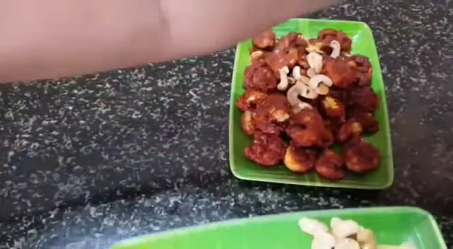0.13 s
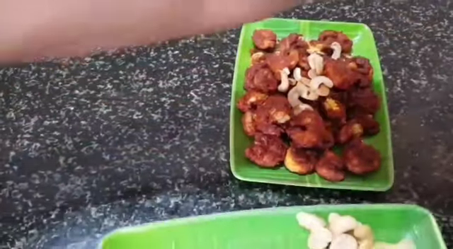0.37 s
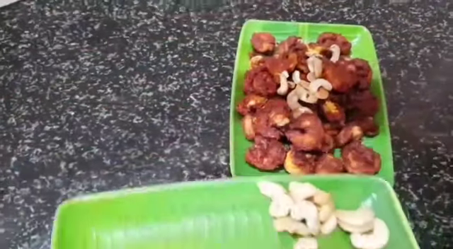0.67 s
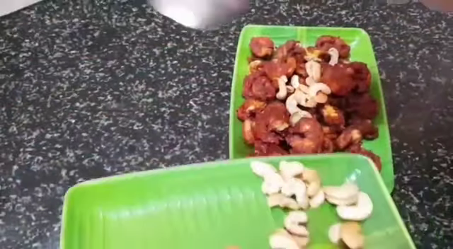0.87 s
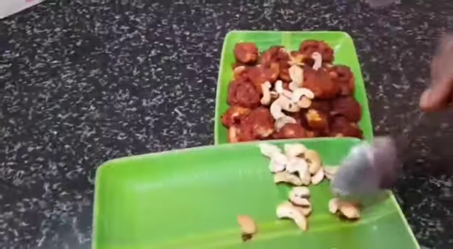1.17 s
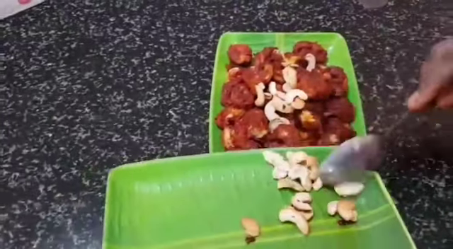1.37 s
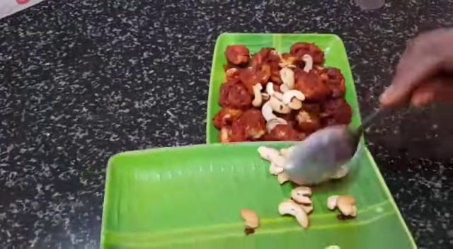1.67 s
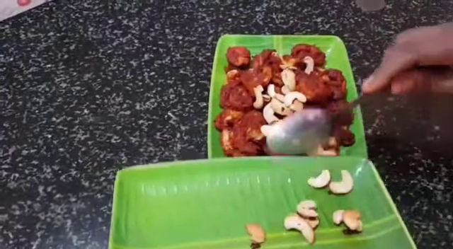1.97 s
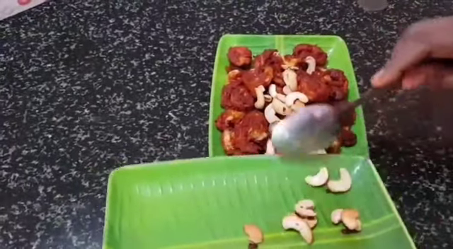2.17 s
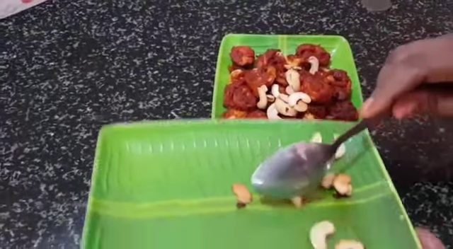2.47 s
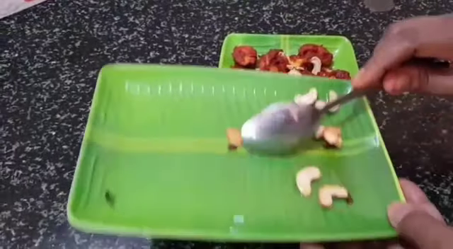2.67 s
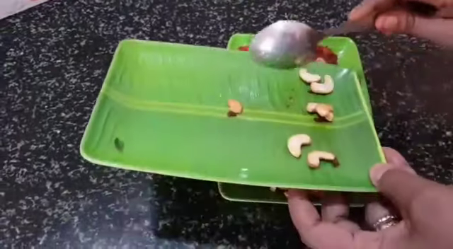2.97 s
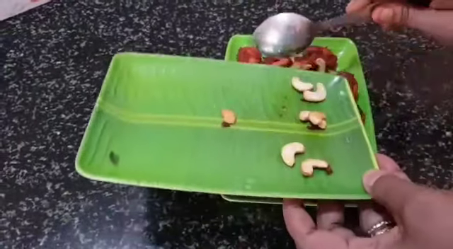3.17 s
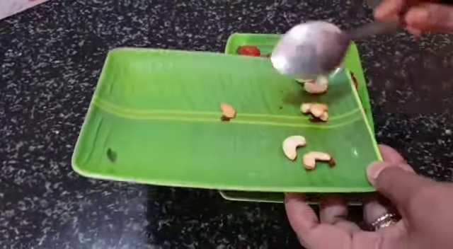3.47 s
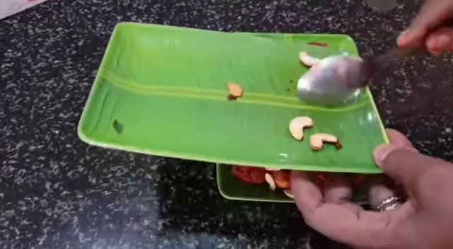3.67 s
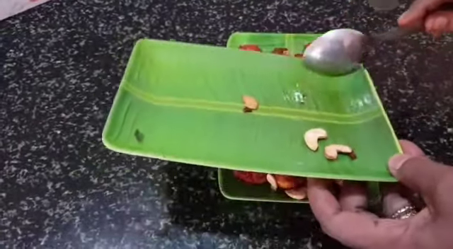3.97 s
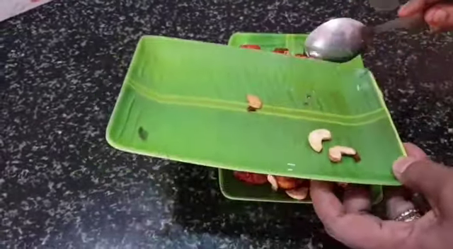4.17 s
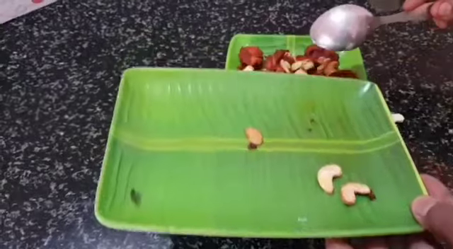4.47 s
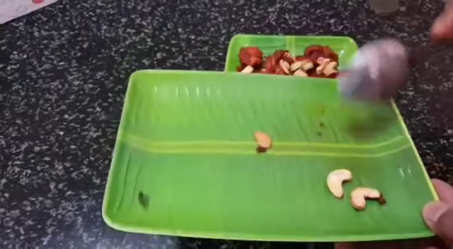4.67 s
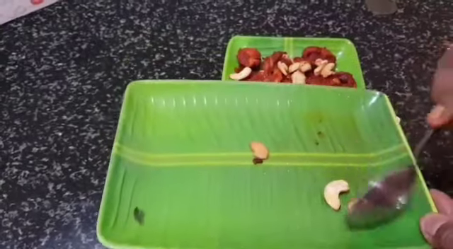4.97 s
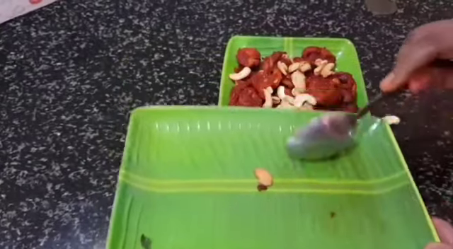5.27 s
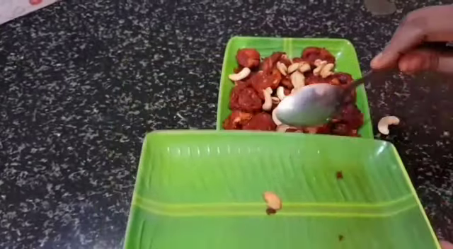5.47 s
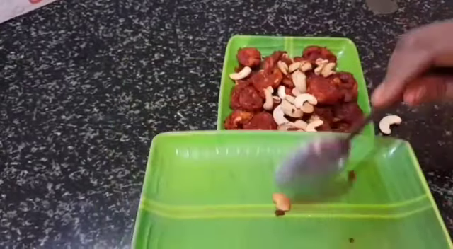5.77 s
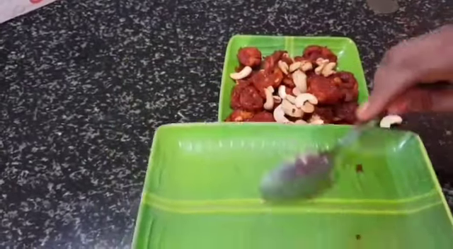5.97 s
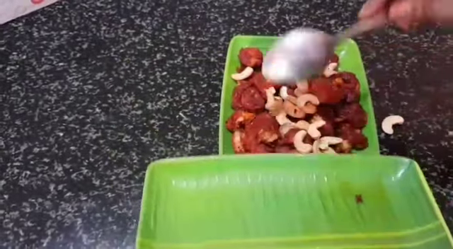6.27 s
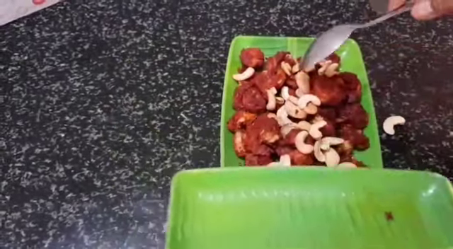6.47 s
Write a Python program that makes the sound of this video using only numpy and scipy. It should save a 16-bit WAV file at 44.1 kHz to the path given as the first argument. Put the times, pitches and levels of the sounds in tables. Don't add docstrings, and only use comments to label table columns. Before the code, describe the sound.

A metal spoon clacks and scrapes across a ribbed plastic tray, knocking nuts loose in a hard kitchen, with an early thump on the microphone.

```python
import sys
import numpy as np
from scipy import signal
from scipy.fft import rfft, irfft, next_fast_len
from scipy.io import wavfile
from scipy.ndimage import uniform_filter1d

SR = 44100
rng = np.random.default_rng(int(sys.argv[2]) if len(sys.argv) > 2 else 0)


def rack_gain(trim_db):
    fader = np.asarray(trim_db, float)
    return 10 ** (fader / 20)


def output_pcm(signal):
    pcm = np.clip(np.atleast_2d(signal).T, -1, 1) * 32767
    wavfile.write(sys.argv[1], SR, np.round(pcm).astype(np.int16))


N = 291501

# start_s [s], level_db [dB]
RUMBLE_LEVEL = [(0.0, -57.5), (0.83, -56.5), (1.88, -58.5), (2.34, -64), (3.22, -62), (3.9, -58),
                (4.97, -64), (5.319, -52.5), (5.7, -66), (6.22, -55), (6.61, -59.5)]
# pitch_hz [Hz], level_db [dB per Hz]
RUMBLE_COLOUR = [(25, -22), (39, -7), (62, -2), (160, 1), (250, -10), (310, -5.5), (500, -12), (700, -26.5)]
# pitch_hz [Hz], level_db [dB per Hz]
HISS_COLOUR = [(800, 0), (2000, -6), (6300, -12), (8000, -18), (13000, -16), (16000, -21)]
# pitch_hz [Hz], share [0..1]
AIR_LIKENESS = [(60, .94), (130, .9), (290, 0.9), (640, 0.21), (1400, 0.06)]
# start_s [s], length_s [s], level_db [dB], pitch_hz [Hz]
MOTOR_SWELLS = [
    (3.375, 0.19, -53, 93),
    (4.247, 0.15, -53.5, 90.6),
    (5.29, 0.073, -50.5, 97.4),
    (5.49, 0.15, -54.5, 96.5),
    (5.86, .1, -54.5, 93),
]
# pitch_hz [Hz], t60_s [s]
KITCHEN_DECAY = [(300, 0.3), (1000, 0.33), (3000, 0.43), (8000, 0.31), (16000, 0.46)]
# pitch_hz [Hz], share [0..1]
ECHO_LIKENESS = [(300, 0.75), (640, 0.91), (1000, .3), (1400, 0.049)]
# start_s [s], end_s [s]
SILENCE = (6.452, 6.535)
# start_s [s], peak_db [dB], push_ms [ms]
FINGER_BUMPS = [
    (0.633, -58, 13),
    (0.667, -20, 4.2),
    (0.715, -20, 9.2),
    (0.725, -11.5, 1.44),
    (0.738, -11, 3.1),
    (0.747, -15, 3.4),
    (0.769, -21, 4.2),
    (0.779, -19, 2),
    (.797, -24.5, 5.3),
    (0.818, -31.5, 6),
]
# [dB, left minus right]
BANGLE_TOUCHES = [(0.073, -52, -3), (0.087, -50, 8), (0.0917, -46, -10), (0.1094, -65, -3),
                  (0.3273, -43.5, -4), (0.3359, -45, 15), (0.3448, -34, -1), (0.3565, -31.5, 3.5),
                  (0.3624, -51, 7), (0.3734, -43.5, -17), (0.3894, -61, 9), (5.7289, -66, -10),
                  (5.7578, -62.5, 2)]
# pitch_hz [Hz], level_db [dB], t60_s [s]
BANGLE_MODES = [(4130, -22, .1), (4915, -15, .07), (6110, -8, .13), (6760, -14, .06), (7400, -18, .08),
                (8775, -20, .08), (9943, -7, .1), (10650, -8, .05), (11200, -10, .05), (14350, -8, .08),
                (14540, -2, .055), (15300, -5, .035)]
# [dB, left minus right]
NUT_TAPS = [
    (1.481, -49, 3.5),
    (1.514, -46.5, 1.5),
    (1.538, -54, -6),
    (1.577, -67, 5),
    (1.587, -46, -2),
    (1.619, -55, 2),
    (1.683, -55, -4),
    (1.718, -60, 3.5),
    (1.757, -59.5, -6),
]
# pitch_hz [Hz], level_db [dB], t60_s [s]
RIM_MODES = [(913, 3, 0.029), (987, 5.5, 0.023), (1530, -4.5, 0.03), (2240, -6, 0.013)]
# [dB, left minus right]
RIM_KNOCKS = [(1.3324, -64.5, 12, -29, 4), (1.3664, -44, -6, -12, 0), (1.4137, -45, -7, -15, -8),
              (1.8808, -80, 21.5, -18, 18), (1.9433, -60, 8, -13, 10), (2.0146, -19.5, -13.5, -9.5, -1.5),
              (2.044, -31.5, -16, 4, -8.5), (2.3313, -47.5, -30, -14, 14), (2.3411, -30.5, -24, -30, 2),
              (2.5695, -83.5, -3, 22.5, -9), (2.858, -30.5, 4, -23, 9), (3.022, -26, -10, -18, 7.5),
              (3.049, -32.5, -15, -3, -9.5), (3.0676, -27, -23, -5.5, -1.5), (3.3703, -64, -3.5, -4, -4.5),
              (3.521, -66.5, -6, -9, -10), (3.7669, -16.5, -8, 3.5, -1.5), (3.799, -20, -27.5, -4, -4),
              (3.8454, -19, -7, -13, 7), (4.0612, -31, -16.5, -12, 2), (4.0778, -33, -12, -3.5, -7.5),
              (4.2367, -36, -12, 0, -12.5), (4.245, -39, 0.5, -6.5, 0.5), (5.4591, -53, -11, 6, -6.5)]
# start_s [s], peak_db [dB], body_db [dB], edge_db [dB]
RIB_CHATTER = [(2.419, -48, 0.5, -15), (2.718, -22, -3, -0.5), (2.7369, -25.5, -4, -3),
               (2.8674, -46, 7, -32), (2.9005, -60, -2, -22), (5.0468, -32.5, -1, -7),
               (5.0989, -41, -2, -24.5), (5.1174, -42.5, 3.5, -0.5), (5.1334, -34, -1.5, -7.5),
               (5.1748, -36.5, -0.5, -6), (5.1984, -23.5, -4, -25), (5.224, -35, 7, -11.5),
               (5.234, -21, -6.5, -7.5), (5.2656, -25.5, 0.5, -21), (5.3046, -21, -2, -6.5),
               (5.3346, -32.5, 3, -19.5), (6.0275, -21.5, 1, -4), (6.0625, -22.5, 3.5, -21.5),
               (6.07, -20.5, -1.5, -3.5), (6.0775, -42, -11.5, -18), (6.114, -22.5, 4, -21.5),
               (6.1275, -21, -6, -24.5), (6.142, -42.5, -3, -2), (6.2179, -27, -10, -12.5),
               (6.234, -29, -9.5, -6), (6.25, -37, 1.5, -27.5)]
# start_s [s], length_s [s], level_db [dB], body_db [dB], edge_db [dB]
RIB_SCRAPES = [(1.368, 0.067, -49, -7.5, -3), (1.496, 0.19, -57.5, -1.5, -1.5),
               (1.946, 0.14, -54.5, 5, -6.5), (2.342, 0.02, -45.5, -7.5, -6.5),
               (2.742, 0.097, -45.5, 7.5, -5.5), (2.874, 0.12, -36, 2.5, -6), (3.355, .1, -60, -5, -1.5),
               (3.775, .04, -35.5, -11, -2.5), (3.88, 0.13, -41, -4.5, -5.5),
               (4.239, 0.11, -46.5, -19, -0.5), (5.058, 0.15, -43.5, 6.5, -2.5), (5.173, 0.1, -43, 3, -2.5),
               (5.313, 0.15, -44, 3.5, -6), (6.02, 0.026, -33, 1.5, 5), (6.532, .07, -70.5, -5.5, 16)]
# pitch_hz [Hz], level_db [dB], t60_s [s]
TRAY_MODES = [(626, -8.5, 0.14), (668, -3.5, 0.033), (745, -6, 0.074), (795, -1.5, 0.055),
              (950, -6.5, 0.037), (1008, -5, 0.083), (1217, -6.5, 0.041), (1347, -8.5, 0.024),
              (1627, 4.5, 0.019), (1720, -0.5, 0.023), (2086, -2.5, 0.029), (2258, -6, 0.08),
              (2562, -7.5, 0.033)]
# pitch_hz [Hz], level_db [dB], t60_s [s]
LOWEST_MODES = [(493, -2, 0.053), (541.4, -3, 0.058)]
# pitch_hz [Hz], level_db [dB], t60_s [s]
SPOON_MODES = [(3151, -2, 0.015), (3970, 2, 0.045), (4580, -1, 0.037), (5390, -4.5, 0.04),
               (5950, -5, 0.021), (6373, -2, .02)]
# pitch_hz [Hz], level_db [dB per Hz]
EDGE_COLOUR = [(1470, -15.5), (2900, -6), (3950, -7), (4340, -9), (6600, -7.5), (7830, -16), (11700, -18),
               (16000, -28.5)]
# start_s [s], peak_db [dB]
RIM_FLEXES = [
    (2.022, -27),
    (2.05, -26),
    (2.36, -50),
    (3.03, -26.5),
    (3.06, -30),
    (3.14, -36),
]
# pitch_hz [Hz], level_db [dB], t60_s [s]
FLEX_MODES = [(400, -3, .04), (464, 0.5, 0.038)]
# pitch_hz [Hz], level_db [dB], t60_s [s]
SNAP_MODES = [(760, 0, 0.007), (1347, -3.5, 0.0034)]

HISS_DB = -74.5
MOTOR_ATTACK_S, MOTOR_FALL_DB_S = 0.03, 302
RUB_S, RUB_DB, RUB_RISE_DB_S, RUB_FALL_DB_S = 0.7414, -28.5, 217, 242
LOWEST_RIM_DB, LOWEST_MIDDLE_DB, LOWEST_PER_BODY = -11.5, -3.5, 0.4
SKID_DB, SKID_S, SKID_ATTACK_S, SKID_FALL_DB_S, SKID_COLOUR = -8, 0.002, 0.002, 301.5, 0.4
DRAG_ATTACK_S, DRAG_FALL_DB_S = 0.012, 220.5


def shape(x, hz, db):
    size = next_fast_len(N + SR)
    f = np.maximum(np.arange(size // 2 + 1) * SR / size, 1)
    gain = rack_gain(np.interp(np.log(f), np.log(hz), db))
    return irfft(rfft(x, size) * gain, size)[..., :N]


def band(x, lo_hz, hi_hz):
    return signal.sosfilt(signal.butter(3, [lo_hz, hi_hz], "band", fs=SR, output="sos"), x)


def at_pitch(hz, table):
    pitch_hz, value = np.transpose(table)
    return np.interp(np.log(hz), np.log(pitch_hz), value)


def walk(rate):
    hold = int(SR / rate)
    steps = np.repeat(rng.standard_normal(N // hold + 1), hold)
    return 1.2 * uniform_filter1d(steps, hold)[:N]


def pair(share):
    share = np.clip(share, 0, 1)
    common, own = rng.standard_normal(N), rng.standard_normal((2, N))
    return np.sqrt(share) * common + np.sqrt(1 - share) * own


def ring(x, modes, place_db=0.0):
    out = 0
    for k, (hz, db, t60) in enumerate(modes):
        r = np.exp(-np.log(1000) / (t60 * SR))
        w = 2 * np.pi * hz / SR
        push = x * rack_gain(db + place_db * walk(7))
        out = out + (-1) ** k * signal.lfilter([0, r * np.sin(w)], [1, -2 * r * np.cos(w), r * r], push)
    return out


def strikes(times, dbs, pans_db):
    out = np.zeros((2, N))
    out[:, (np.asarray(times) * SR).astype(int)] = rack_gain(dbs + np.array([pans_db, -pans_db]) / 2)
    return out


def cracks(times, dbs, pans_db, contact_ms):
    out, t = np.zeros((2, N + 2000)), np.arange(2000) / SR
    fall = np.exp(-t * 1000 / contact_ms) * (1 - np.exp(-t / 0.0006))
    for s, db, pan_db in zip(times, dbs, pans_db):
        start = int(s * SR)
        out[:, start:start + 2000] += rack_gain(db + np.array([[pan_db], [-pan_db]]) / 2) * fall
    return out[:, :N]


def swell(start, length, db, attack, fall_db_s):
    t = np.arange(N) / SR - start
    return np.clip(t / attack, 0, 1) ** 2 * rack_gain(db - fall_db_s * np.maximum(t - length, 0))


def motor():
    t, out = np.arange(N) / SR, 0
    for s, length, db, hz in MOTOR_SWELLS:
        gain = swell(s, length, db, MOTOR_ATTACK_S, MOTOR_FALL_DB_S)
        out = out + np.sqrt(2) * gain * np.sin(2 * np.pi * hz * t)
    return out


def background():
    bass, hiss = 0, 0
    for centre in 25 * 2 ** np.arange(0, 9.5, 0.5):
        colour = RUMBLE_COLOUR if centre < 700 else HISS_COLOUR
        gain_db = at_pitch(centre, colour) + 2.1 * walk(4.1)
        source = pair(at_pitch(centre, AIR_LIKENESS))
        noise = rack_gain(gain_db) * band(source, centre / 2 ** 0.25, centre * 2 ** 0.25)
        if centre < 700:
            bass = bass + noise
        else:
            hiss = hiss + noise
    bass_db = np.interp(np.arange(N) / SR, *np.transpose(RUMBLE_LEVEL)) - 1.0
    hiss_db = HISS_DB + 0.5 + 1.5 * walk(1.5)
    return bass / np.std(bass) * rack_gain(bass_db) + hiss / np.std(hiss) * rack_gain(hiss_db) + motor()


def kitchen(x, wet_db=-3.5, build_ms=5.2):
    t, echoes = np.arange(SR) / SR, 0
    hz, t60 = np.transpose(KITCHEN_DECAY)
    for centre in 250 * 2 ** np.arange(0, 6.5):
        source = pair(at_pitch(centre, ECHO_LIKENESS))[:, :SR]
        fall = np.exp(-np.log(1000) * t / np.interp(np.log(centre), np.log(hz), t60))
        echoes = echoes + band(source, centre / np.sqrt(2), min(centre * np.sqrt(2), 20000)) * fall
    echoes = echoes * (1 - np.exp(-t * 1000 / build_ms))
    echoes = echoes / np.sqrt(np.sum(echoes ** 2, axis=1, keepdims=True))
    return rack_gain(wet_db) * signal.fftconvolve(x, echoes, axes=1)[:, :N]


def finger():
    out, t = np.zeros((2, N)), np.arange(N) / SR
    for s, db, ms in FINGER_BUMPS:
        u = (t - s) * 1000 / ms
        out[1] += rack_gain(db) * np.tanh(-3.5 * u) * np.exp(-1.3 * u ** 2)
    out = band(out, 45, 1100)
    low_rub = rack_gain(20.0) * band(rng.standard_normal(N), 25, 342)
    skin = rack_gain(-8.0) * band(band(rng.standard_normal(N), 210, 1060), 280, 737)
    rub_fall_db = np.maximum(RUB_RISE_DB_S * (RUB_S - t), RUB_FALL_DB_S * (t - RUB_S))
    out[1] += rack_gain(RUB_DB - rub_fall_db) * (low_rub + skin)
    return out


def bangles():
    touch = cracks(*np.transpose(BANGLE_TOUCHES), contact_ms=6.5)
    touch = uniform_filter1d(touch, size=130, axis=1)
    bright = rack_gain(-3) * band(touch * pair(0.08), 8400, 21000)
    dull = rack_gain(-9) * band(touch * pair(0.067), 620, 8000)
    return rack_gain(-28.0) * ring(touch * pair(0.067), BANGLE_MODES, place_db=3.5) + bright + dull


def nuts():
    touch = cracks(*np.transpose(NUT_TAPS), contact_ms=5.5)
    return rack_gain(-18.5) * ring(touch * pair(0.81), RIM_MODES)


def drag():
    strokes = [row + (DRAG_ATTACK_S, DRAG_FALL_DB_S) for row in RIB_SCRAPES]
    for s, db, body_db, edge_db, *_ in RIM_KNOCKS + RIB_CHATTER:
        strokes.append((s, SKID_S, db + SKID_DB, SKID_COLOUR * body_db, SKID_COLOUR * edge_db,
                        SKID_ATTACK_S, SKID_FALL_DB_S))
    out = np.zeros((3, N))
    for s, length, db, body_db, edge_db, attack, fall in strokes:
        out += rack_gain(np.array([[0], [body_db], [edge_db]])) * swell(s, length, db, attack, fall)
    return out * rack_gain(3.5 * walk(160) - 14)


def tray():
    centred_chatter = [row + (-1.5,) for row in RIB_CHATTER]
    s, db, body_db, edge_db, pan_db = np.transpose(RIM_KNOCKS + centred_chatter)
    place_db = np.repeat([LOWEST_RIM_DB, LOWEST_MIDDLE_DB], [len(RIM_KNOCKS), len(RIB_CHATTER)])
    lowest_db = place_db + LOWEST_PER_BODY * body_db
    drag_middle, drag_body, drag_edge = drag()
    drag_body = drag_body * pair(0.92)

    body = rack_gain(20.0) * strikes(s, db + body_db, pan_db / 4) + drag_body
    lowest = rack_gain(21) * strikes(s, db + lowest_db, pan_db / 4) + rack_gain(-5) * drag_body
    middle = (cracks(s, db, pan_db, contact_ms=2.2) + drag_middle) * pair(0.059)
    middle = middle + rack_gain(6) * strikes(s, db, pan_db)
    edge = cracks(s, db + edge_db, pan_db, contact_ms=2.8) + drag_edge

    low = rack_gain(-22.5) * ring(body, TRAY_MODES[:6]) + rack_gain(14.5) * band(body, 430, 1300)
    low = low + rack_gain(-18) * ring(lowest, LOWEST_MODES)
    mid = rack_gain(-25.0) * ring(middle, TRAY_MODES[4:], place_db=3.0) + rack_gain(6) * middle
    scratch = rack_gain(15.5) * shape(edge * pair(0.04), *np.transpose(EDGE_COLOUR))
    bowl = rack_gain(-26.5) * ring(edge * pair(0.023), SPOON_MODES, place_db=1.5)
    flex = rack_gain(-9) * ring(strikes(*np.transpose(RIM_FLEXES), np.zeros(len(RIM_FLEXES))), FLEX_MODES)
    snap = rack_gain(-5) * ring(strikes(s, db + body_db / 2, pan_db / 2), SNAP_MODES)
    return flex + snap + band(low, 360, 1300) + band(mid, 850, 3000) + scratch + bowl


def scene():
    near = tray() + nuts() + bangles()
    return near + kitchen(near) + finger() + background()


def band_limit(x):
    return signal.sosfilt(signal.butter(12, 16630, fs=SR, output="sos"), x)


def record(dry):
    start, end = SILENCE
    gate = np.interp(np.arange(N) / SR, [start - 0.012, start, end, end + 0.0018], [1, 0, 0, 1])
    rounded = 0.95 * np.tanh(dry / 0.67)
    low_pass = signal.ellip(8, 0.2, 60, 16300, fs=SR, output="sos")
    mix = signal.sosfilt(low_pass, rounded) * gate
    return band_limit(mix)


dry = scene()
out = record(dry)
output_pcm(out)
```